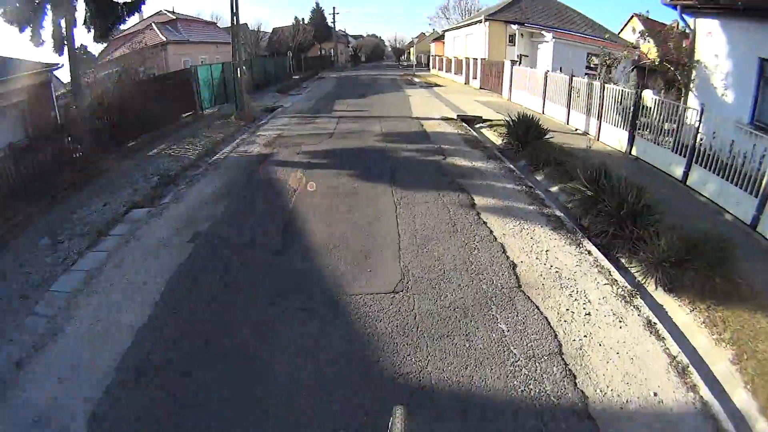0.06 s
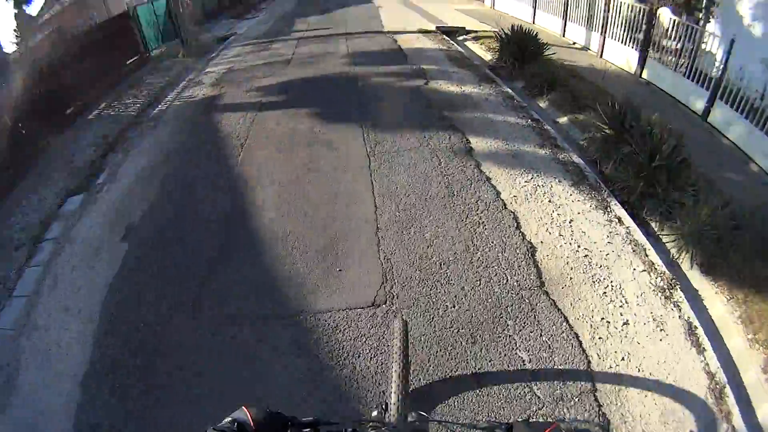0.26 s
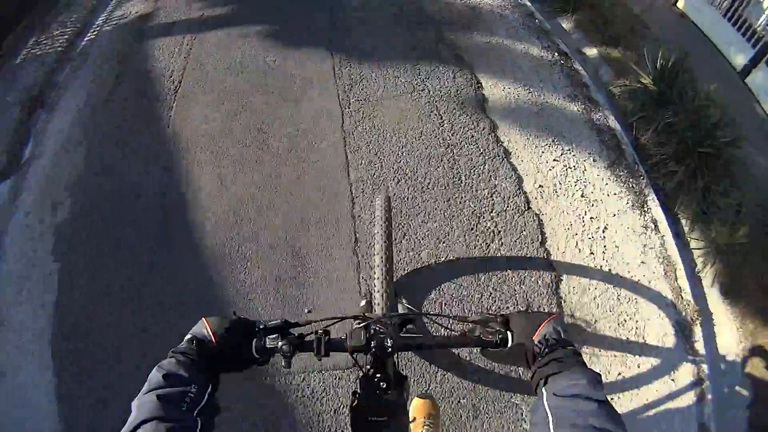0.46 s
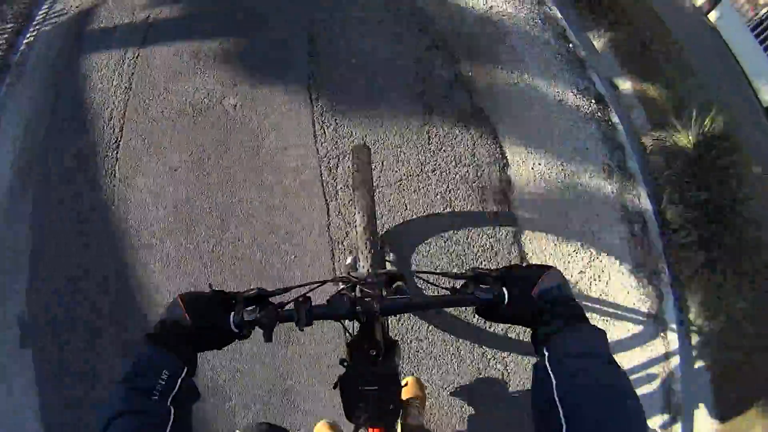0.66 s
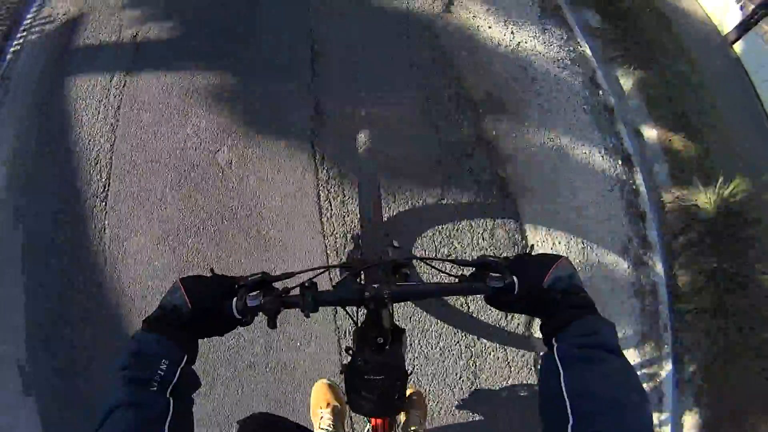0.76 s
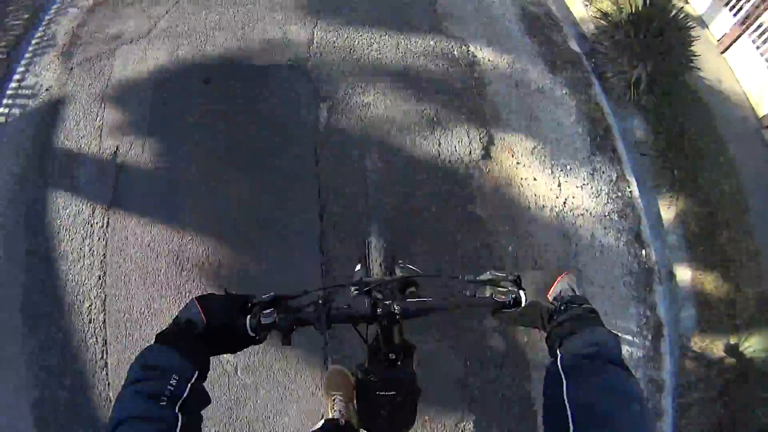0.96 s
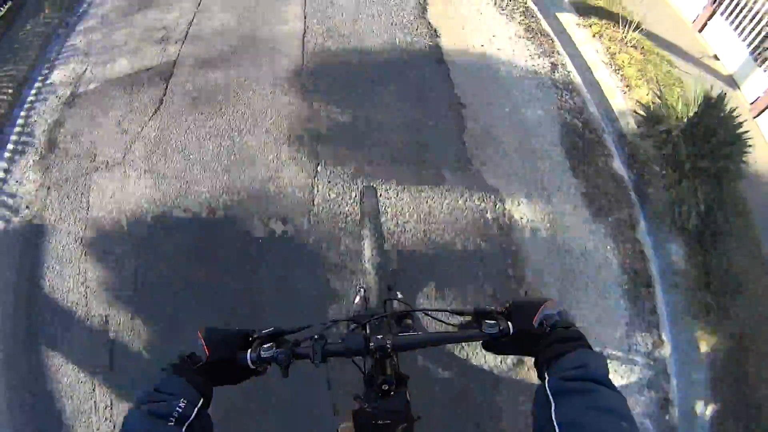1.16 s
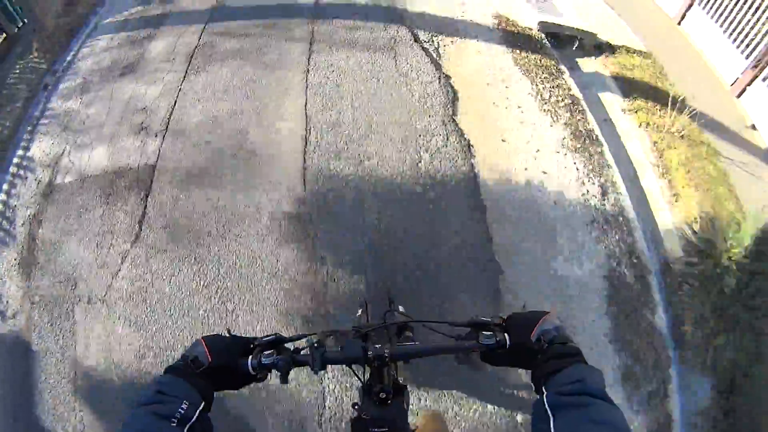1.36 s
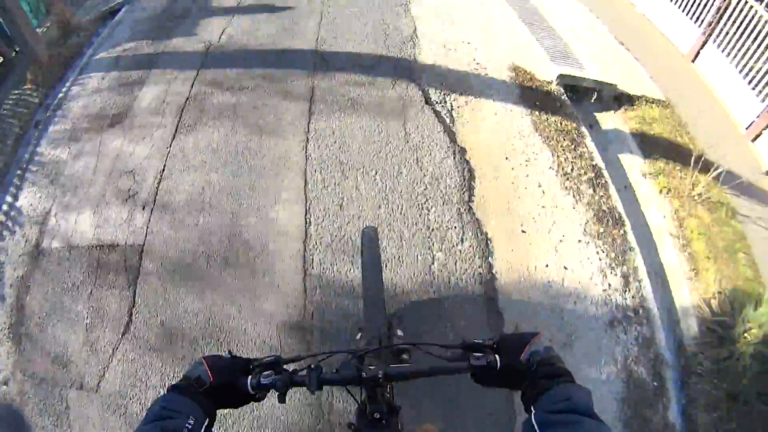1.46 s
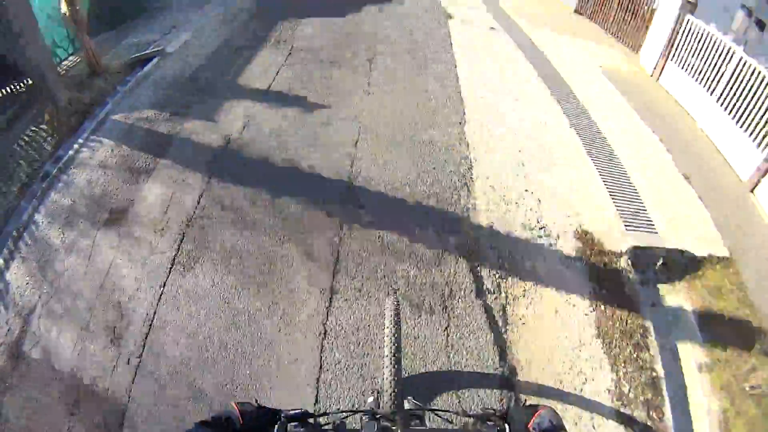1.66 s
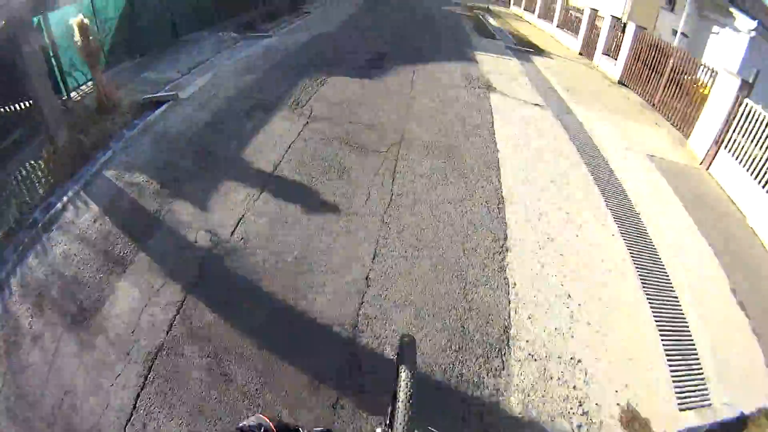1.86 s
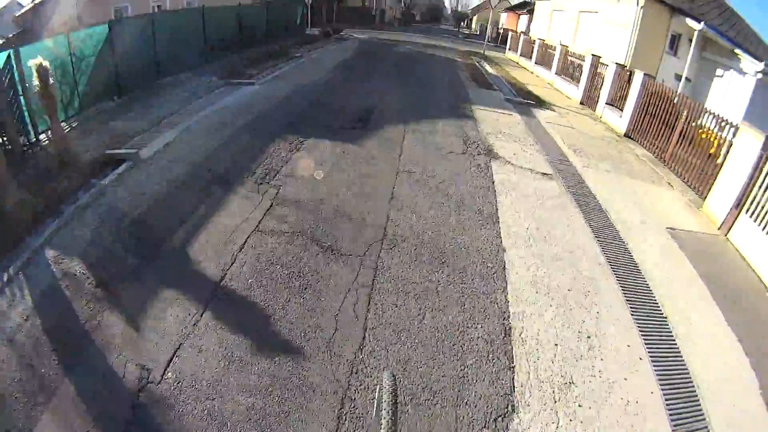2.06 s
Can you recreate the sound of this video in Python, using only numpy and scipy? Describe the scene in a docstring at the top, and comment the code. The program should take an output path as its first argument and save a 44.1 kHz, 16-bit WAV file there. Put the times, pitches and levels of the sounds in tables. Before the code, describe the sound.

A bicycle drivetrain whirrs and rattles, then fades as knobbly tyres hiss along asphalt

```python
"""A bicycle drivetrain whirrs in swells as knobbly tyres roll along an asphalt street, heard from the rider's chest.
Grains of slip excite metal resonances and a broad scrape; wavering tones ring and bunched clicks rasp.
The tyres hiss (coloured grains), hum (resonant noise) and flick up grit (decaying bursts).
Road bumps thump as decaying sines; wind rumbles as low noise on the microphone."""
import sys
import numpy as np
from scipy import signal
from scipy.fft import rfft, irfft
from scipy.io import wavfile
from scipy.ndimage import uniform_filter1d

SR = 44100
rng = np.random.default_rng(int(sys.argv[2]) if len(sys.argv) > 2 else 0)


def transcribe(u):
    """Save the signal u as a 16-bit wav file named by the first command-line argument.

    u: samples, shape (n,) or (channels, n), limited to [-1, 1]; the rate is SR.
    q: integer samples, one column per channel.
    """
    v = np.clip(np.atleast_2d(u).T, -1, 1)
    q = np.round(v * 32767).astype(np.int16)
    wavfile.write(sys.argv[1], SR, q)


N = 92301


def undb(db):
    """Decibels to gain."""
    return 10 ** (np.asarray(db) / 20)


def unit(x):
    """Scale to rms 1."""
    return x / np.sqrt(np.mean(x ** 2))


def curve(rows, after=None):
    """Gain over time from (t/s, level/dB) points; after=0 falls silent past the last one."""
    t, rows = np.arange(N) / SR, np.array(rows)
    gain = undb(np.interp(t, *rows.T))
    return gain if after is None else np.where(t > rows[-1, 0], after, gain)


def over_hz(rows, axis=1):
    """One column of a table on the frequency grid, interpolated over log frequency."""
    rows = np.array(rows)
    f_hz = np.fft.rfftfreq(2 * N, 1 / SR)
    return np.interp(np.log(f_hz + 1), np.log(rows[:, 0]), rows[:, axis])


def filtered(x, gain):
    """Causal minimum-phase filter with the given gain over frequency, scaled to unit mean power."""
    cepstrum = irfft(np.log(gain))
    cepstrum[1:N] *= 2  # fold onto positive time
    cepstrum[N + 1:] = 0
    response = np.exp(rfft(cepstrum))
    return irfft(rfft(x, 2 * N) * response)[..., :N] / np.sqrt(np.mean(gain ** 2))


def colour(x, rows):
    """Shape by (f/Hz, density/dB) points; white input keeps its power."""
    return filtered(x, undb(over_hz(rows)))


def resonate(x, rows):
    """Ring steep-sided resonances (f/Hz, width/Hz, level/dB), scaled to rms 1."""
    f_hz = np.fft.rfftfreq(2 * N, 1 / SR)
    power = sum(undb(db) ** 2 / (1 + ((f_hz - hz) / width) ** 2 * 2) ** 2 for hz, width, db in rows)
    return unit(filtered(x, np.sqrt(power)))


def walk(rate_hz):
    """Slow random curve of rms 1: noise averaged twice over 1 / rate_hz."""
    k = max(int(SR / rate_hz), 1)
    once = uniform_filter1d(rng.standard_normal(N), k, mode="wrap")
    return unit(uniform_filter1d(once, k, mode="wrap"))


def grains(per_s, spread_db):
    """Tiny random contacts; one row common to both ports and one that sets them apart."""
    hit = rng.random(N) < per_s / SR
    size = undb(spread_db * rng.standard_normal(N))
    return unit(hit * size * np.sign(rng.standard_normal((2, N))))


def bursts(rows, decay_s):
    """A one-sample snap and a decaying crackle at each (t/s, level/dB)."""
    t = np.arange(N) / SR
    snap, crackle = 5.2, 0.55
    envelope = sum(undb(db) * (t >= s) * np.exp(-np.abs(t - s) / decay_s) for s, db in rows)
    out = crackle * rng.standard_normal((2, N)) * envelope
    for s, db in rows:
        out[0, min(int(s * SR), N - 1)] += snap * undb(db)  # common row
    return out


def squeal(hz, wander_hz, flutter_db):
    """A friction-driven mode whose pitch and strength waver; rms 1."""
    phase = 2 * np.pi * np.cumsum(hz + wander_hz * walk(125)) / SR
    common = np.sin(phase) * undb(flutter_db * np.tanh(walk(175)))
    apart = np.cos(phase) * walk(90)
    return unit(np.array([common, apart]))


def ports(x, pan_db=0, width=1):
    """Carry common and apart rows to two microphone ports that differ in level and phase."""
    # port difference: f/Hz, left minus right/dB, lead of left/rad
    port_offsets = [(100, -0.6, 0.094), (260, 0.5, -0.79), (430, -0.5, -2.04), (730, 2.5, -1.84),
                    (960, 3.5, -0.76), (1160, -0.5, -1.3), (1310, 4.5, -0.96), (1520, -0.5, -0.31),
                    (1760, 1.5, -0.64), (1990, 4, 0.99), (2560, 2, 0.37), (3250, -3.5, 0.89),
                    (4000, -2, -0.81), (5600, 0, 0.079), (6800, -0.5, 0.75), (10000, -.3, -0.27)]
    # likeness of left and right: f/Hz, correlation/0-1
    port_likeness = [(60, 1), (160, 0.94), (300, 0.46), (650, 0.57), (1000, 0.6), (1300, 0.9), (1700, 0.87),
                     (2020, 0.47), (2550, 0.98), (3400, 0.84), (5000, 0.76), (6500, 0.44), (10000, 0.72)]
    common, apart = rfft(x, 2 * N)
    like = np.clip(over_hz(port_likeness), 0, 1)
    sign = np.array([[1], [-1]])  # left, right
    pair = common * np.sqrt((1 + like) / 2) + sign * width * apart * np.sqrt((1 - like) / 2)
    level = undb(sign * (over_hz(port_offsets) + pan_db) / 2)
    turn = np.exp(.5j * sign * over_hz(port_offsets, axis=2))
    return irfft(pair * level * turn)[:, :N]


def wind():
    """Low buffeting of the riding wind: noise weighted to the lowest frequencies."""
    # spectrum: f/Hz, density/dB
    wind_colour = [(8, -17), (18, 0), (27, 0), (40, -8), (70, -14.5), (150, -20.5), (300, -32), (1000, -49)]
    # strength: t/s, level/dB
    wind_level = [(0, -58), (.3, -63), (.5, -53.5), (.9, -58.5), (1.2, -56), (1.5, -55.5), (2.09, -58)]
    return curve(wind_level) * unit(colour(rng.standard_normal((2, N)), wind_colour))


def bumps():
    """Road bumps jolt the frame: soft low thumps as decaying sines, alike in both ports."""
    # jolts: t/s, level/dB
    jolts = np.array([(0.332, -53), (0.541, -53), (0.711, -42), (.765, -50)])
    thump_hz, decay_s = 50, 0.026
    age_s = np.maximum(np.arange(N) / SR - jolts[:, :1], 0)
    return undb(jolts[:, 1]) @ (np.sin(2 * np.pi * thump_hz * age_s) * np.exp(-age_s / decay_s))


def tyres():
    """Tread blocks patter on asphalt, each band flickering alone; they hum via the frame and flick grit."""
    # hiss spectrum: f/Hz, density/dB
    hiss_colour = [(200, -15), (340, -5), (450, -8), (700, -10.5), (1100, -7), (1400, 5), (1700, -3),
                   (2050, -5.5), (2500, -10), (2950, 1.5), (3450, -3), (4200, -9.5), (5100, -10),
                   (6200, -13.5), (8500, -15.5), (11000, -23)]
    # hiss strength: t/s, level/dB
    hiss_level = [(0, -50.5), (.5, -45), (.9, -48.5), (1.25, -48), (1.5, -47.5), (1.7, -50.5),
                  (2.09, -47.5)]
    # flickering bands: low f/Hz, high f/Hz
    hiss_bands = [(20, 2200), (2200, 4400), (4400, 6500), (6500, 16000)]
    # extra gain of the top band: t/s, level/dB
    treble_level = [(0, -0.5), (.6, -0.5), (.85, 1.5), (1.15, 2), (1.35, -0.5), (1.7, 0), (2.09, -1)]
    # tread hum modes: f/Hz, width/Hz, level/dB
    hum_modes = [(91.6, 10.7, -1), (113.8, 23, -6), (164.5, 11.2, -7), (350, 51, -15.5)]
    # hum strength: t/s, level/dB
    hum_level = [(0, -44.5), (.17, -55), (.3, -54.5), (.55, -55.5), (.9, -58.5), (1.4, -59.5), (1.7, -59.5),
                 (2.09, -59)]
    # flicked grit: t/s, level/dB
    grit_hits = [(.0214, -53), (.4482, -29), (.5716, -39), (1.084, -40.5), (1.2605, -37), (1.266, -40.5),
                 (1.3445, -35.5), (1.376, -35), (1.4805, -37), (1.787, -44), (1.797, -39), (1.9074, -38.5),
                 (1.909, -29.5)]
    # grit spectrum: f/Hz, density/dB
    grit_colour = [(300, -30), (2300, -15), (2900, 9.5), (3700, 6), (4500, -3), (5200, -1.5), (6000, -15),
                   (11000, -21.5)]
    flutter_db, drift_db, fine_grit_db = 1.73, 1.25, -59.5

    f_hz = np.fft.rfftfreq(2 * N, 1 / SR)
    patter = rfft(colour(grains(per_s=8000, spread_db=4.0), hiss_colour), 2 * N)
    bands = []
    for low_hz, high_hz in hiss_bands:
        band = irfft(patter * (f_hz >= low_hz) * (f_hz < high_hz))[:, :N]
        bands.append(band * undb(flutter_db * walk(135) + drift_db * walk(13.4)))
    hiss = sum(bands[:-1]) + bands[-1] * curve(treble_level)
    hum = resonate(rng.standard_normal((2, N)), hum_modes) * curve(hum_level)
    grit = bursts(grit_hits, decay_s=0.0015) + undb(fine_grit_db) * grains(per_s=70, spread_db=3)
    return hiss * curve(hiss_level) + hum + colour(grit, grit_colour)


def rattles():
    """Brief swells of coarse clicks that bunch at an uneven rate, with a few harder knocks."""
    # swells: centre t/s, half length to 1/e /s, level/dB
    rasp_swells = [(.082, 0.017, -39), (0.326, 0.053, -38), (0.377, 0.0054, -47), (0.622, 0.0072, -55),
                   (0.701, .016, -42.5), (.755, .012, -46.5), (0.918, .012, -55), (1.726, 0.0087, -48.5),
                   (1.805, .012, -52), (2.041, 0.048, -34)]
    # spectrum: f/Hz, density/dB
    rasp_colour = [(100, -14.5), (600, -23), (950, -7), (1080, -7), (1300, -4), (1650, -1), (1880, -3.5),
                   (2150, -1), (3100, -6), (3800, -31.5), (4500, -16), (5500, -10), (7000, -15.5),
                   (8200, -23), (11000, -48)]
    # knocks: t/s, level/dB
    knock_hits = [(.3305, -24), (.371, -37), (.38, -32.5), (.693, -44), (.710, -34), (2.0065, -30),
                  (2.015, -28), (2.0205, -24), (2.0298, -28), (2.039, -23), (2.0485, -24.5), (2.055, -28),
                  (2.0695, -24)]
    rattle_hz, depth, decay_cycles = 107.5, 1.6, 0.22

    t = np.arange(N) / SR
    swell = sum(undb(db) * np.exp(-((t - s) / half_s) ** 2) for s, half_s, db in rasp_swells)
    phase_cycles = np.cumsum(rattle_hz * (1 + .15 * walk(60))) / SR % 1
    bunch = unit(1 + depth * np.exp(-phase_cycles / decay_cycles))
    clicks = grains(per_s=4000, spread_db=1) * bunch * swell
    return colour(clicks + bursts(knock_hits, decay_s=0.001), rasp_colour)


def drivetrain():
    """Dense slips ring the metal and scrape; three wavering friction-driven modes sound over them."""
    # friction: t/s, level/dB
    whirr_level = [(0, -40), (.03, -38.5), (.12, -35), (.2, -35), (.27, -36), (.32, -37), (.41, -40),
                   (.52, -44.5), (.6, -48), (.66, -50.5), (.92, -63), (1.18, -48.5), (1.5, -60.5),
                   (1.7, -58), (1.85, -55), (1.9, -48.5), (1.98, -39.5), (2.04, -33.5), (2.09, -40.5)]
    # metal resonances: f/Hz, width/Hz, level/dB
    body_modes = [(561, 62, -15.5), (794.5, 46, -13), (925, 75, -13), (1190, 62, -6.5), (1274, 46, -3),
                  (1346, 24, -1.5), (1408.5, 39, -1), (1492, 124, -6), (1562, 91, -2.5), (1700, 55, -7),
                  (1795, 80, -8.5)]
    # broad scrape: f/Hz, density/dB
    scrape_colour = [(100, -16), (250, -5), (450, -11), (800, -0.5), (1080, -2.5), (1300, -3), (1750, -5.5),
                     (1950, -4.5), (2900, -1), (4200, -20), (5300, -9.5), (7500, -24), (11000, -36)]
    # singing mode: t/s, level/dB
    sing_level = [(0, -46), (.15, -56), (.19, -39), (.235, -37), (.28, -33.5), (.31, -44.5), (.43, -46.5),
                  (.56, -51.5), (.595, -43.5), (.63, -63), (1.0, -74), (1.86, -66), (1.945, -46),
                  (2.03, -39.5), (2.09, -46)]
    # thin ring of rubbing metal: t/s, level/dB
    ring_level = [(0, -67), (.025, -43.5), (.055, -52), (.09, -46.5), (.135, -41.5), (.155, -48),
                  (.21, -42.5), (.27, -53), (.4, -68)]
    # faint low mode: t/s, level/dB
    drone_level = [(0, -60), (.3, -69), (.45, -57), (.58, -60), (.68, -80)]
    slips_per_s, scrape_db = 2500, -9

    body = resonate(grains(slips_per_s, spread_db=2), body_modes)
    scrape = undb(scrape_db) * colour(grains(slips_per_s, spread_db=3.5), scrape_colour)
    sing = squeal(hz=1330, wander_hz=14.1, flutter_db=2) * curve(sing_level)
    ring = squeal(hz=2552, wander_hz=42.8, flutter_db=7) * curve(ring_level, after=0)
    drone = squeal(hz=568, wander_hz=16.7, flutter_db=2) * curve(drone_level, after=0)
    return (body + scrape) * curve(whirr_level) + sing + ring + drone


def scene():
    """The whole bicycle and the wind at the microphone."""
    rolling = ports(drivetrain() + tyres() + wind())
    rasping = ports(rattles(), pan_db=-1.5, width=1.36)
    return rolling + rasping + bumps()


def record(dry):
    """A steep elliptic low-pass cuts the top."""
    top_hz = 11150
    return signal.sosfilt(signal.ellip(12, .1, 70, top_hz, fs=SR, output="sos"), dry)


dry = scene()
out = record(dry)
transcribe(out)
```